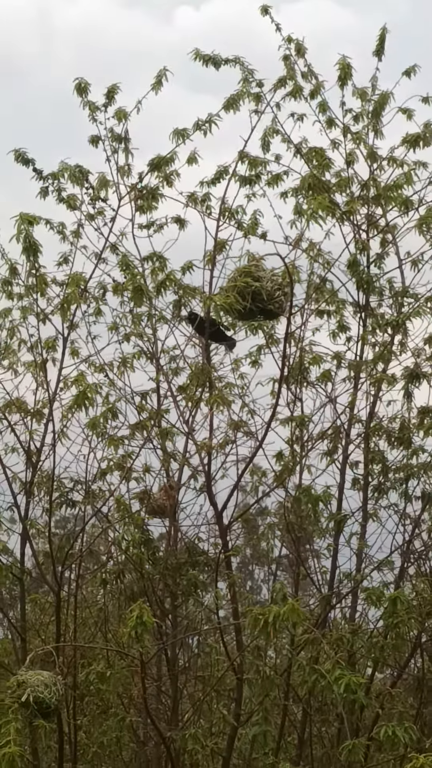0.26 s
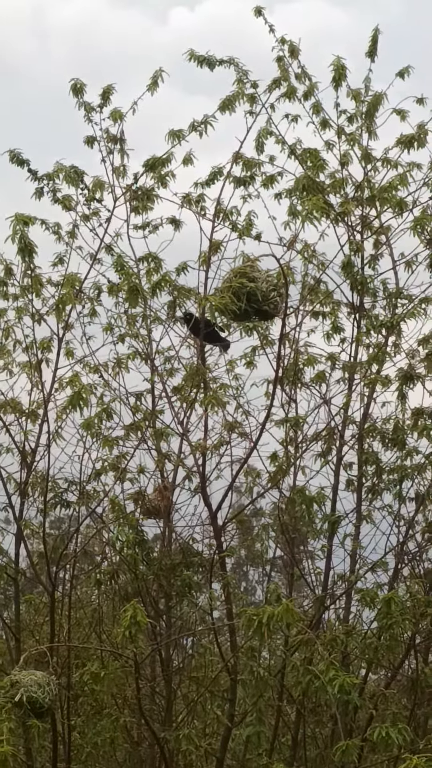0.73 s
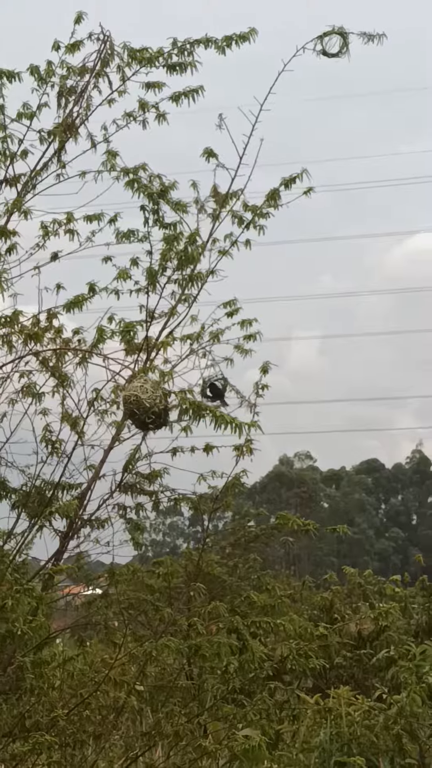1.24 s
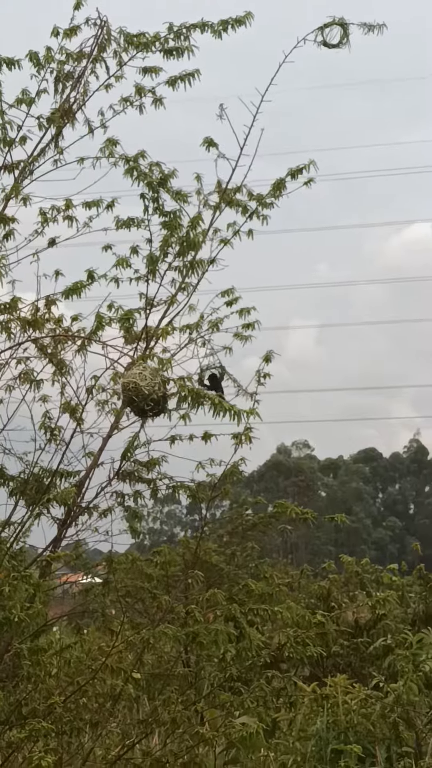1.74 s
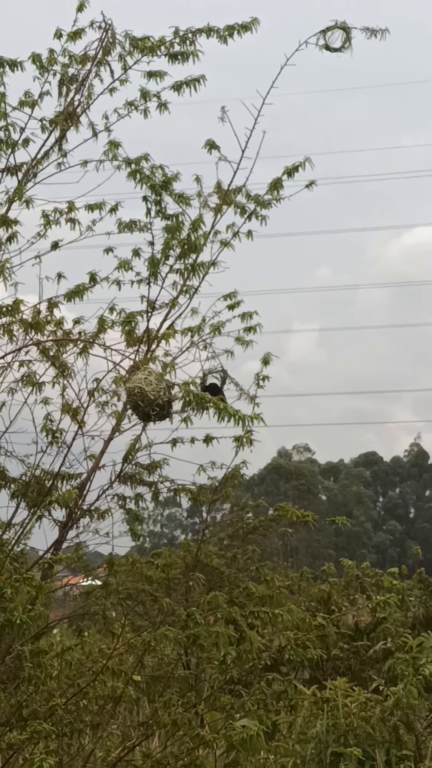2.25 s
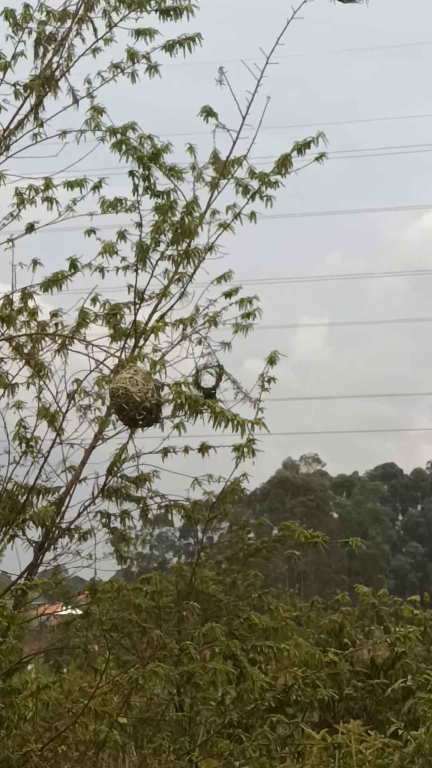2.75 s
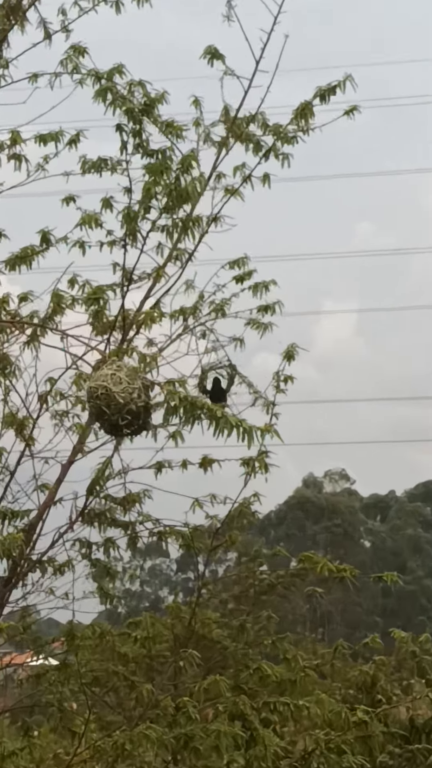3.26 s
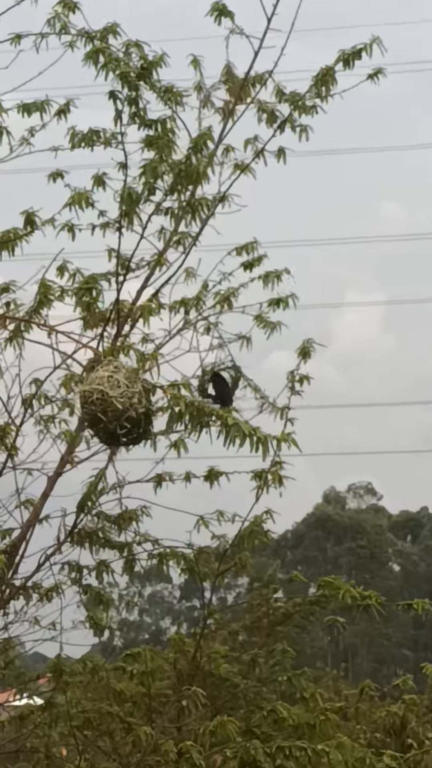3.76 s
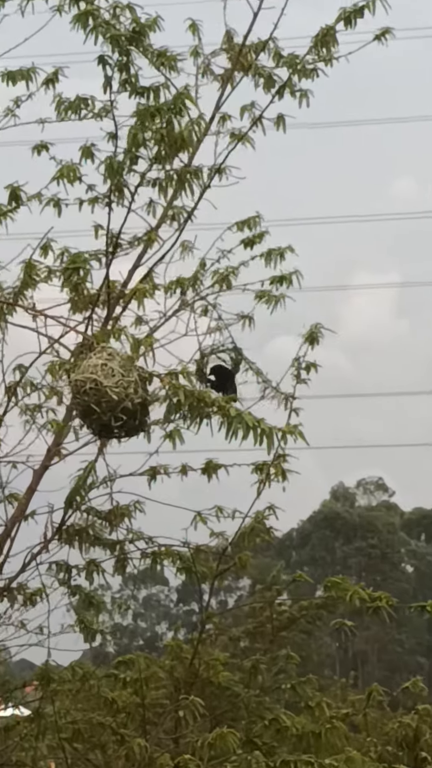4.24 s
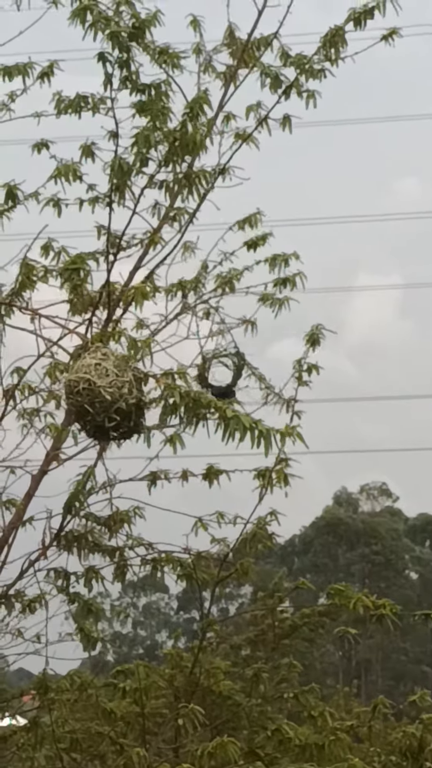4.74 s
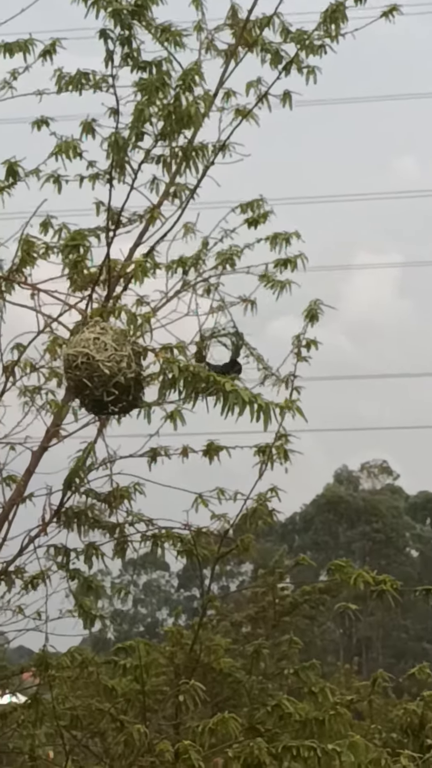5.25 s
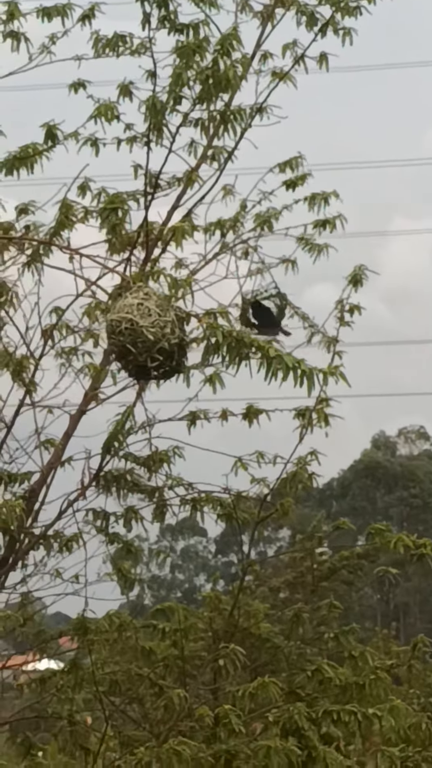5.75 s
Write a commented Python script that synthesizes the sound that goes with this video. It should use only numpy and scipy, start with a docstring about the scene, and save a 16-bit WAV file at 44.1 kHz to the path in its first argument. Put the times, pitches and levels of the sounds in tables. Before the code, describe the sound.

Many small birds twitter outdoors throughout, over trilling, droning insects, soft open air and a faint low rumble. Thin high whistles and faint hoarse calls come first. From about 0.3 seconds, nearer weaver birds, slightly to the left, give quick, sharp, rising chirps that crack into falling rasps, mixed with short whistled notes. A harsh buzz runs from 1.5 to 1.8 seconds. The chatter is busiest between 2 and 3 seconds. Squeaky, rasping scolds come at about 2.3, 3, 3.7 and 4.7 seconds and at the very end. Faint low rattles sound at 2.4 and 4.2 seconds, and two distant clear whistles arch at about 2.8 and 3.8. A high, buzzing wheeze holds from 3.7 to 4.3 seconds. A distant nasal call sags and drops from 5.1 to 5.7 seconds, while the chirps continue, slightly softer, until 6 seconds.

```python
"""Thin whistles and faint hoarse calls come first, then the two-voiced chirps of a weaver colony in the trees.
Chirps rise, level off or arch over, then crack into a falling rasp; scolds, a wheeze and a harsh buzz join.
The calls are sines on moving pitches, roughened by random jitter and scattered off leaves and trees.
Farther off are more birds, low rattles, a nasal call, trilling insects and a low outdoor rumble."""
import sys
import numpy as np
from scipy import signal
from scipy.fft import rfft, irfft, next_fast_len
from scipy.io import wavfile
from scipy.ndimage import uniform_filter1d, map_coordinates

SR = 44100
rng = np.random.default_rng(int(sys.argv[2]) if len(sys.argv) > 2 else 0)


def to_wav(sig):
    """Store sig (one row per channel, or 1-D mono) as 16-bit WAV at the path in sys.argv[1].

    Samples outside -1..1 are clipped; the rate is SR.
    """
    pcm = np.clip(np.atleast_2d(sig), -1, 1) * 32767
    pcm = np.round(pcm).astype(np.int16)
    wavfile.write(sys.argv[1], SR, pcm.T)  # frames by channels


N = 264600  # samples, six seconds

# Spectrum of the open air. Each row: frequency in Hz, relative density in dB per Hz.
AIR_SPECTRUM = [(110, 3.5), (180, 0), (300, 5), (520, -2.5), (900, -1), (1400, -3), (2100, -7.5),
                (2700, -36), (4000, -11), (7000, -69)]
# Spectrum of the low distant rumble. Each row: frequency in Hz, relative density in dB per Hz.
RUMBLE_SPECTRUM = [(12, -23), (25, -31), (32, -15), (42, 2), (54, -1), (70, -0.5), (110, -6.5),
                   (155, -19.5), (220, -28), (450, -81)]
RUMBLE_DB, RUMBLE_RISE_DB_PER_S, RUMBLE_SWING_DB = -53.5, 0.27, 1.5  # it grows slowly and wavers
# Levels of two nearer insects. Each row: time in seconds, cricket in dB, ticker in dB.
INSECT_LEVELS = [(0, -52, -72), (.3, -50, -52), (.9, -55, -56), (2.4, -62, -59), (3.2, -49.5, -51.5),
                 (3.6, -59, -47.5), (4.35, -57, -48.5), (4.53, -47, -45.5), (4.58, -49.5, -64),
                 (6, -48, -55)]
# Bands of many distant insects. Each row: centre in Hz, width in Hz, relative level in dB.
DRONE_BANDS = [(4210, 180, -9), (5600, 490, -6), (6650, 250, -7.5), (7670, 1050, -18)]
# Swell of the distant birds. Each row: time in seconds, reference level in dB.
COLONY_LEVEL = [(0.0, -54.5), (0.32, -49.5), (0.45, -44.5), (1.6, -45.5), (1.94, -44), (2.31, -41.5),
                (2.61, -43), (2.97, -42.5), (3.09, -47), (4.48, -48), (4.61, -43), (5.01, -48.5),
                (5.7, -53), (6.0, -48)]
# Spectrum of the distant birds. Each row: frequency in Hz, relative density in dB per Hz.
COLONY_SPECTRUM = [(1500, -17.5), (2200, -6.5), (2800, -10), (4000, 0), (5700, -5.5), (7000, -6),
                   (9500, -2.5), (10500, -12.5), (12000, -21), (14500, -14), (15800, -23)]
# Distant hoarse calls.
# Each row: start in seconds, length in seconds, mid pitch in Hz, glide in Hz, level in dB, hoarseness in Hz.
FAR_CALLS = [(0, 0.36, 2000, -220, -66.5, 22), (0.06, .17, 1504, -70, -61, 23),
             (0.19, .19, 1427, -150, -56.5, 21), (1.687, 0.08, 1535, 157, -56, 55),
             (1.682, 0.11, 770, 64, -61.5, 57), (2.866, 0.055, 1800, 250, -56, 40),
             (3.236, 0.037, 1706, -200, -51, 40), (3.652, 0.094, 1234, 374, -61.5, 70),
             (4.291, 0.13, 1473, 400, -57, 36), (5.065, 0.077, 2000, 100, -58, 35)]
# Two long, clear, distant whistles that rise, arch over and fade, one list each.
# Each row: time in seconds, pitch in Hz, level in dB before a shared lift.
FAR_WHISTLES = [
    [(2.78, 1273, -56), (2.84, 1487, -58), (3.0, 1427, -54), (3.13, 1278, -53.5), (3.27, 1195, -58),
     (3.33, 1150, -62), (3.52, 957, -66)],
    [(3.82, 1800, -56), (3.885, 2500, -60), (3.93, 2650, -54), (3.98, 2720, -62), (4.04, 2600, -49),
     (4.08, 2500, -52), (4.115, 2050, -75)],
]
# A distant nasal call that sags, then drops away.
# Each row: time in seconds, pitch in Hz, level in dB, hoarseness as a share of the pitch,
# other harmonics over the main one in dB.
NASAL_CONTOUR = [(5.13, 555, -57, 0.052, 9), (5.209, 537, -49.5, 0.048, 2), (5.361, 523, -49, 0.041, -3.5),
                 (5.499, 506, -48.5, 0.043, -6), (5.555, 455, -49, 0.031, -6), (5.595, 425, -43, 0.02, -14),
                 (5.63, 365, -59, 0.028, -12), (5.719, 260, -47, 0.094, -2)]
NASAL_MAIN = 4  # number of the main harmonic
# The other harmonics, with half steps where the voice doubles its period.
# Each row: multiple of the pitch, relative level in dB.
NASAL_HARMONICS = [(1, -10.5), (2, -8), (3, -4.5), (3.5, -15), (4.5, -5.5), (5, 0.5), (5.5, -8), (6, 0.5)]
# Low rattling calls.
# Each row: start in seconds, length in seconds, mid pitch in Hz, glide in Hz, level in dB.
CHURRS = [(2.41, 0.21, 975, 40, -58.5), (4.157, 0.194, 1089, 147, -56.5)]
CHURR_PULSE_HZ = 64.2
# Soft down-slurs, all on one contour. Each row: start in seconds, level in dB.
SLURS = [(0.905, -45), (1.221, -39), (2.274, -38.5), (3.08, -46), (3.189, -45.5), (3.615, -46),
         (3.899, -50), (4.893, -52), (5.157, -46), (5.204, -44.5)]
SLUR_S, SLUR_START_HZ, SLUR_MIDDLE_HZ, SLUR_END_HZ = .035, 4664, 4026, 2910
# Contour of the wheeze. Each row: time in seconds, pitch in Hz, level in dB.
WHEEZE_CONTOUR = [(3.66, 5640, -47.5), (3.774, 5470, -34.5), (3.859, 5524, -34.5), (4.022, 5520, -35),
                  (4.2, 5396, -36.5), (4.26, 5450, -39), (4.32, 5540, -51)]
# A harsh buzz. Each row: start in seconds, length in seconds, start pitch in Hz, end pitch in Hz,
# fall of each syllable in Hz, syllables per second, level in dB.
TRILLS = [(1.523, .29, 4164, 3504, 900, 63, -39.5)]
# Whistled notes.
# Each row: start in seconds, length in seconds, mid pitch in Hz, glide in Hz, level in dB.
NOTES = [(0, 0.1, 8320, 700, -42), (0.07, 0.017, 6820, -160, -32), (0.104, 0.014, 6650, -420, -33),
         (0.246, 0.091, 6700, -600, -41), (0.852, 0.031, 7150, 0, -39.5), (0.887, 0.029, 6270, 0, -39.5),
         (1.13, 0.021, 7190, 450, -36.5), (1.156, 0.04, 5840, -570, -31.5), (1.312, 0.07, 3985, 203, -39.5),
         (1.361, 0.06, 5950, -900, -38), (1.405, 0.03, 4210, -180, -36.5), (1.535, 0.015, 8850, -1550, -38),
         (1.571, 0.0188, 4200, -270, -38), (1.871, 0.03, 4120, -500, -34), (1.899, 0.022, 5100, 120, -40),
         (1.955, 0.021, 6960, -200, -41), (1.993, 0.072, 3920, -200, -38.5), (2.021, 0.12, 5540, 700, -42),
         (2.411, 0.021, 10270, -2100, -36), (2.441, 0.057, 5190, 302, -36),
         (2.519, 0.053, 5590, 500, -41.5), (2.599, 0.031, 6180, -1900, -37.5),
         (2.623, 0.052, 3990, -2, -37.5), (2.678, 0.029, 4300, 102, -38), (2.713, 0.036, 5100, 550, -37),
         (2.807, 0.056, 4220, 300, -37), (3.339, 0.061, 5650, 250, -36), (3.419, 0.039, 7300, -1300, -43),
         (3.445, 0.077, 5950, -1000, -37.5), (4.488, 0.027, 3380, 0, -40.5),
         (4.514, 0.0091, 5480, 602, -38.5), (4.561, 0.015, 6520, 3100, -40),
         (4.974, 0.031, 4210, -500, -43.5), (4.778, 0.079, 7100, 1500, -37.5)]
NOTE_ARCH = 0.0284  # both ends of a note sag by this share of its pitch
# Sound radiated by the open beak. Each row: frequency in Hz, gain in dB.
BEAK_GAIN = [(1000, 10.5), (2500, -12.5), (4000, -0.5), (6000, 4), (7500, 1), (9800, 4), (11500, -10),
             (15000, -17)]
# Harsh notes on their own. Each row: start in seconds, length in seconds, mid pitch in Hz,
# level in dB before the trim inside rasp(), wildness from 0 to 1.
RASPS = [(0.073, 0.071, 7190, -41.5, 1), (0.598, 0.05, 6360, -39.5, 0.73), (0.843, 0.073, 5490, -38.5, 1),
         (1.873, 0.061, 5006, -35.5, 0.9), (2.406, 0.018, 5270, -34, 0.63),
         (2.557, 0.055, 6440, -36.5, 0.96), (3.77, 0.0217, 5400, -41, .7),
         (5.217, 0.041, 4750, -35.5, 0.52), (5.607, 0.044, 4680, -34, 0.53)]
RASP_FALL = .17  # a long rasp sinks by this share of its pitch
# Scatter of pitch at a middling pitch; at equal wildness, lower rasps scatter more.
CHAOS_HZ, CHAOS_AT_HZ, CHAOS_SLOPE = 956, 5710, 1.25
# Scolds, a high squeak that breaks into a long rasp.
# Each row: start in seconds, squeak level in dB, rasp level in dB before the trim inside rasp().
SCOLDS = [(2.314, -30, -32.5), (2.99, -36, -33.5), (3.674, -35.5, -37.5), (4.711, -33.5, -39.5),
          (5.952, -37.5, -34)]
SQUEAK_S, SQUEAK_START_HZ, SQUEAK_END_HZ, SQUEAK_SWELL_DB = 0.052, 6790, 7430, 0.5
SQUEAK_LOWER_HZ = 2828  # ceiling of the lower voice
SCOLD_DELAY_S, SCOLD_S, SCOLD_HZ = .04, .082, 6580  # the rasp of a scold: delay, length, pitch
# Two-voiced chirps. Each row: start in seconds, length in seconds, shape, pitch at no climb in Hz,
# pitch at full climb in Hz, level in dB before a shared lift, sum tone of the two voices in dB,
# overtones in dB, closing rasp over the listed chirp level in dB before the trim inside rasp().
CHIRPS = [(0.327, 0.078, "sweep", 5010, 7090, -30, -9.5, 1, -3),
          (0.454, 0.133, "sweep", 5420, 7820, -32.5, -11.5, 3, -22),
          (0.59, 0.078, "sweep", 5560, 7470, -41, -24, -19, 1),
          (0.737, 0.09, "shelf", 5050, 6750, -31, -7.5, 0, -4),
          (.988, 0.091, "arch", 5250, 6750, -30, -10, 4, -0.5),
          (1.261, 0.099, "arch", 5255, 6765, -31, -12.5, -1, -4.5),
          (1.402, 0.061, "sweep", 5540, 8460, -37, -13, -10, -25),
          (1.579, 0.095, "arch", 5260, 6670, -31, -8.5, -2, -3),
          (2.091, 0.071, "arch", 5350, 7540, -32, -13.5, -8, 0.5),
          (2.177, 0.091, "shelf", 5330, 7100, -33.5, -9.5, -15, -14),
          (2.746, 0.043, "sweep", 5640, 7740, -34.5, -22, -14, -1),
          (2.82, 0.096, "shelf", 5750, 7105, -31, -15.5, -23, -20),
          (4.036, 0.07, "sweep", 5270, 6680, -28, -11, -8, -22),
          (4.399, 0.068, "sweep", 5720, 7860, -34.5, -12, -2, 0.5),
          (4.589, 0.095, "shelf", 5150, 6980, -30, -10, -3, -7),
          (4.96, 0.11, "shelf", 5230, 6730, -35, -11.5, -3, -5),
          (5.31, 0.099, "shelf", 5230, 6710, -35.5, -13, -7, -12),
          (5.559, .066, "sweep", 5870, 7720, -41, -18, -10, -15),
          (5.749, 0.091, "shelf", 5290, 6820, -32.5, -7.5, -2, -0.5)]
# Chirp shapes by name. Each row: share of the length, share of the climb,
# ceiling of the lower voice in Hz, effort in dB, the lower voice's octave in dB.
CHIRP_SHAPES = { "shelf": [(0, -.2, 3100, -10, -12), (.15, .17, 3100, -6, -14), (.4, 0.34, 3120, -3.5, -30),
                (.58, 0.75, 3110, -3, -5.5), (.8, .94, 2650, -3.5, -7.5), (1, 0.89, 2350, -4, -15)],
                "arch": [(0, -.05, 2400, -14, -17.5), (.24, .35, 2440, -0.5, -18), (.5, .8, 2394, -5, -18),
                (.68, 1, 2298, -2.5, -18), (.86, .93, 2255, -0.5, -13), (1, 0.51, 2200, -6.5, -10)],
                "sweep": [(0, 0.021, 3130, -6, -21), (.2, .18, 3110, -8, -25), (.5, .46, 3085, -3.5, -12),
                (.8, 0.78, 2954, -1.5, -11), (1, 0.87, 2455, 0, -18.5)]}
# The closing rasp: lead before the chirp ends, length, pitch, share of it lost.
BREAK_LEAD_S, BREAK_S, BREAK_HZ, BREAK_FALL = 0.0096, .025, 5830, 0.41
TOP_HZ = 15800  # band limit of the recorder


def amp(db):
    """Decibels to gain."""
    return 10 ** (np.asarray(db) / 20)


def unit(x):
    """Scale to rms 1."""
    return x / np.sqrt(np.mean(x ** 2) + 1e-20)


def along(points, hz):
    """(Hz, value) points read on a log axis."""
    f, v = np.transpose(points)
    return np.interp(np.log(np.abs(hz) + 1), np.log(f + 1), v)


def curves(rows):
    """One value per sample for each column after the time."""
    s, *cols = np.transpose(rows)
    return [np.interp(np.arange(N) / SR, s, c) for c in cols]


def span(rows):
    """Start time of a contour and the slice of samples it covers."""
    first, last = rows[0][0], rows[-1][0]
    return first, slice(int(first * SR), int(last * SR))


def wobble(rate, size):
    """A smooth random curve with rate knots a second."""
    knots = rng.standard_normal(int(size * rate / SR) + 4)
    return map_coordinates(knots, [np.arange(size) * rate / SR], mode="nearest")


def filtered(x, response):
    """x times a response of frequency."""
    m = next_fast_len(N + SR // 2)
    return irfft(rfft(x, m) * response(np.fft.rfftfreq(m, 1 / SR)), m)[..., :N]


def phase(hz):
    """Running phase of a moving frequency."""
    return 2 * np.pi * np.cumsum(hz) / SR


def progress(length):
    """0 to 1 over one call."""
    return np.linspace(0, 1, int(length * SR))


def arch(u, start, middle, end):
    """A parabolic glide through three pitches."""
    return np.polyval(np.polyfit([0, .5, 1], [start, middle, end], 2), u)


def gate(u, rise, fall):
    """Soft opening and closing, as shares of the call."""
    return np.sin(np.pi / 2 * np.clip(np.minimum(u / rise, (1 - u) / fall), 0, 1)) ** 2


def add(out, s, sound):
    """Mix a stereo sound in at time s."""
    i = min(max(round(s * SR), 0), N)
    out[:, i:i + sound.shape[1]] += sound[:, :N - i]


def scatter(t60):
    """Stereo noise echoes that build within milliseconds and die by 60 dB in t60 seconds."""
    t = np.arange(SR // 3) / SR
    echoes = rng.standard_normal((2, len(t))) * amp(-60 * t / t60) * (1 - np.exp(-t / .002))
    return unit(echoes) / np.sqrt(len(t))


def outdoors(call, leaves_db, trees_db, left_db, lag=.001, stray=.08):
    """The direct path, a quick scatter off nearby leaves, and a faint tail from the trees around."""
    paths = amp(leaves_db) * scatter(t60=.03) + amp(trees_db) * scatter(t60=.35)
    paths *= amp([[1.5], [-1.5]])
    left_delay = abs(lag * (1 + stray * rng.standard_normal()))  # each perch has its own bearing
    paths[0, int(left_delay * SR)] += amp(left_db / 2)
    paths[1, 0] += amp(-left_db / 2)
    return signal.fftconvolve(call[None], paths / np.sqrt(np.sum(paths ** 2) / 2), axes=1)


def rush(spectrum, alike, patchy_db, left_db, lag=0.001033):
    """Stereo noise of rms 1 with patches of random gain; it reaches the left side a little later."""
    z = signal.stft(rng.standard_normal((2, N)), nperseg=512)[2]
    field = uniform_filter1d(rng.standard_normal(z.shape[1:]), size=6, axis=0)  # across frequency
    field = uniform_filter1d(field, size=9, axis=1)  # across time
    pair = signal.istft(z * amp(patchy_db * unit(field)), nperseg=512)[1][:, :N]
    mid, side = filtered(pair, lambda hz: amp(along(spectrum, hz)))
    side = side * np.tan(np.arccos(np.clip(alike, 0, 1)) / 2)
    left = filtered(mid + side, lambda hz: np.exp(-2j * np.pi * hz * lag))
    return unit(np.array([left, mid - side]) * amp([[left_db / 2], [-left_db / 2]]))


def background(air_db=-57):
    """Open air and a low distant rumble, both shaped noise."""
    rumble_db = RUMBLE_DB + RUMBLE_RISE_DB_PER_S * np.arange(N) / SR + RUMBLE_SWING_DB * wobble(9, N)
    air = amp(air_db) * rush(AIR_SPECTRUM, alike=0.62, patchy_db=2.5, left_db=5.0)
    return air + amp(rumble_db) * rush(RUMBLE_SPECTRUM, alike=1.0, patchy_db=0.5, left_db=3.5)


def stridulation(db, stroke_hz, ring_hz, droop_hz, duty, uneven, leaves_db, left_db):
    """Each wing stroke rings one resonance, whose pitch droops through the stroke; the level wavers."""
    stroke = (phase(stroke_hz * (1 + uneven * wobble(12, N))) / (2 * np.pi)) % 1
    tone = np.sin(phase(ring_hz + droop_hz * (.5 - stroke / duty) + 130 * wobble(1200, N)))
    call = amp(db + 2 * wobble(30, N)) * unit(tone * gate(stroke / duty, rise=.25, fall=.4))
    return outdoors(call, leaves_db, trees_db=-13, left_db=left_db, lag=.00155, stray=0)[:, :N]


def insects(drone_db=-45):
    """A trilling cricket, a higher and faster ticker, and the steady drone of many more."""
    cricket_db, ticker_db = curves(INSECT_LEVELS)
    cricket = stridulation(cricket_db, stroke_hz=39.76, ring_hz=4530, droop_hz=764, duty=.8,
                           uneven=0.045, leaves_db=-3.5, left_db=1.0)
    ticker = stridulation(ticker_db, stroke_hz=68.9, ring_hz=8346, droop_hz=215.4, duty=0.6,
                          uneven=0.0081, leaves_db=0, left_db=17.5)
    hz = np.geomspace(1000, SR / 2, 400)
    bands = sum(amp(db) / (1 + ((hz - centre) / width) ** 2) ** 2 for centre, width, db in DRONE_BANDS)
    spectrum = np.transpose([hz, 20 * np.log10(bands)])
    drone = rush(spectrum, alike=0.09, patchy_db=2.0, left_db=2.0)
    return cricket + ticker + amp(drone_db) * drone


def whistle(u, hz, waver, overtone_db):
    """One thin tone of rms 1 with an unsteady pitch and a weak octave."""
    hz = hz * (1 + waver * wobble(343, len(u)))
    octave = amp(overtone_db + along(BEAK_GAIN, 2 * hz)) * np.sin(phase(2 * hz))
    tone = np.sin(phase(hz)) + octave * (2 * hz < SR / 2)
    strength = gate(u, rise=.25, fall=.12) * amp(2.2 * wobble(220, len(u)))
    return unit(tone * strength)


def colony(count=950, size=14, blur_db=-0.4, slur_db=-8.5):
    """Faint, mostly falling slurs from many perches, crowding as the level swells, over a noise blur of voices."""
    level, = curves(COLONY_LEVEL)
    out = amp(level + blur_db) * rush(COLONY_SPECTRUM, alike=0.02, patchy_db=6.0, left_db=2.5)
    activity = np.cumsum(amp(level))
    perches = np.zeros((size, 1, N))
    for when, length, height, slope, bend, strength, perch in rng.random((count, 7)):
        i = np.searchsorted(activity, when * activity[-1])
        u = progress(0.014 + .028 * length)
        centre = 1750 * 5.2 ** (height ** .95)
        steepness = (2500 / centre) ** 0.7  # low slurs sweep widest
        sweep = 0.74 * (slope - .7) * (u - .5) - 0.633 * bend * (u - .5) ** 2
        hz = centre * (1 + steepness * sweep)
        db = level[i] + slur_db + .75 * along(COLONY_SPECTRUM, centre) + 8 * (strength - .5)
        call = amp(db) * whistle(u, hz, waver=0.016, overtone_db=-32)
        add(perches[int(perch * size)], i / SR, call[None])
    for calls in perches:
        add(out, 0, outdoors(calls[0], leaves_db=-1, trees_db=-7, left_db=10))
    return out


def far_voice(hz, db, hoarse_hz, fade):
    """One low tone from beyond the colony, roughened by a jittering pitch."""
    u = np.linspace(0, 1, len(hz))
    tone = np.sin(phase(hz + hoarse_hz * wobble(600, len(u))))
    return outdoors(amp(db) * unit(tone * gate(u, fade, fade)), leaves_db=-7, trees_db=-5, left_db=14)


def far_calls(whistle_lift_db=1, whistle_hoarse_hz=13):
    """Lower, slower calls from beyond the colony: hoarse glides and long clear whistles."""
    out = np.zeros((2, N))
    for s, length, hz, glide_hz, db, hoarse_hz in FAR_CALLS:
        pitch = hz + glide_hz * (progress(length) - .5)
        add(out, s, far_voice(pitch, db, hoarse_hz, fade=0.036))
    for rows in FAR_WHISTLES:
        first, part = span(rows)
        hz, db = np.array(curves(rows))[:, part]
        add(out, first, far_voice(hz, db + whistle_lift_db, whistle_hoarse_hz, fade=0.025))
    return out


def nasal_call():
    """A far voice: hoarse harmonics thin to a clearer tone near the end, then roughen in the final drop."""
    first, part = span(NASAL_CONTOUR)
    hz, db, hoarse, others_db = np.array(curves(NASAL_CONTOUR))[:, part]
    cycle = phase(hz * (1 + hoarse * wobble(380, len(hz))))
    others = sum(amp(level + 3 * wobble(14, len(hz))) * np.sin(k * cycle) for k, level in NASAL_HARMONICS)
    voice = np.sin(NASAL_MAIN * cycle) + amp(others_db) * others
    call = amp(db) * unit(voice) * gate(np.linspace(0, 1, len(hz)), rise=0.039, fall=0.026)
    out = np.zeros((2, N))
    add(out, first, outdoors(call, leaves_db=-5, trees_db=-5, left_db=12))
    return out


def churrs(chaos_hz=110):
    """A low, hoarse rattle from beyond the colony: a quick run of rough pulses that swells and fades."""
    out = np.zeros((2, N))
    for s, length, hz, glide_hz, db in CHURRS:
        u = progress(length)
        pulse = (u * length * CHURR_PULSE_HZ + .08 * wobble(40, len(u))) % 1
        pitch = hz + glide_hz * (u - .5) + chaos_hz * wobble(500, len(u))
        swell = gate(u, rise=.15, fall=0.33) * amp(2.8 * wobble(60, len(u)))
        strength = gate(pulse, rise=0.29, fall=0.45) * swell
        call = amp(db) * unit(np.sin(phase(pitch)) * strength)
        add(out, s, outdoors(call, leaves_db=-3, trees_db=-5.5, left_db=7.5))
    return out


def tick(db=-50, start_s=.425):
    """One soft tick: a brief sine that drops quickly in pitch."""
    u = progress(0.0124)
    drop = np.sin(phase(1800 * 0.16 ** u)) * gate(u, rise=0.12, fall=0.62)
    out = np.zeros((2, N))
    add(out, start_s, outdoors(amp(db) * unit(drop), leaves_db=-6, trees_db=-24, left_db=5))
    return out


def slurs(spread=0.041):
    """One falling note, repeated at slightly different pitches from deep in the leaves."""
    out = np.zeros((2, N))
    u = progress(SLUR_S)
    contour = arch(u, SLUR_START_HZ, SLUR_MIDDLE_HZ, SLUR_END_HZ)
    for s, db in SLURS:
        pitch = contour * (1 + spread * rng.standard_normal())
        call = whistle(u, pitch, waver=0.04, overtone_db=-25)
        add(out, s, outdoors(amp(db) * call, leaves_db=5, trees_db=-1, left_db=10))
    return out


def wheeze(pulse_hz=368, hiss_db=-13.0, fizz_db=-27):
    """A drawn-out buzz: fast uneven pulses on one high tone, with fuzzy overtones."""
    hz, db = curves(WHEEZE_CONTOUR)
    beat = phase(pulse_hz * (1 + 0.0712 * wobble(120, N)))
    tone = np.sin(phase(hz + 55 * wobble(60, N) + 125 * wobble(900, N) + 130 * np.sin(beat)))
    hiss = amp(hiss_db) * np.sin(phase(1.88 * hz + 450 * wobble(2000, N)))
    fizz = amp(fizz_db) * np.sin(phase(2.4 * hz + 700 * wobble(1800, N)))
    call = amp(db) * unit((1 + 0.55 * np.cos(beat)) * (tone + hiss + fizz))
    first, part = span(WHEEZE_CONTOUR)
    out = np.zeros((2, N))
    add(out, first, outdoors(call[part], leaves_db=-5.0, trees_db=-9.0, left_db=-5, lag=0.001093))
    return out


def trills(chaos_hz=230):
    """A dense buzz of tiny, rough, unevenly spaced down-slurs."""
    out = np.zeros((2, N))
    for s, length, start, end, fall_hz, rate, db in TRILLS:
        u = progress(length)
        syllable = (u * length * rate + .24 * wobble(60, len(u))) % 1
        hz = start + (end - start) * u + fall_hz * (.5 - syllable) + chaos_hz * wobble(1500, len(u))
        swell = amp(2.5 * wobble(400, len(u))) * gate(u, rise=.15, fall=.15)
        strength = gate(syllable, rise=.15, fall=.3) * swell
        call = amp(db) * unit(np.sin(phase(hz)) * strength)
        add(out, s, outdoors(call, leaves_db=-3, trees_db=-6, left_db=11))
    return out


def notes():
    """Short, slightly arched whistles, stronger on the left."""
    out = np.zeros((2, N))
    for s, length, hz, glide_hz, db in NOTES:
        u = progress(length)
        pitch = hz * (1 - NOTE_ARCH * (2 * u - 1) ** 2) + glide_hz * (u - .5)
        call = whistle(u, pitch, waver=0.0358, overtone_db=-13)
        add(out, s, outdoors(amp(db) * call, leaves_db=-2, trees_db=-8, left_db=9))
    return out


def rasp(length, hz, fall, wildness, trim_db=-1, upper_db=-6, lower_db=-7, overtone_db=-12):
    """The syrinx goes chaotic: pitch and strength jump about from one millisecond to the next."""
    u = progress(length)
    chaos_hz = wildness * CHAOS_HZ * (CHAOS_AT_HZ / hz) ** CHAOS_SLOPE
    half_pitch = (hz * (1 + fall * (.5 - u)) + chaos_hz * wobble(2200, len(u))) / 2
    voice = 0
    for k, partial_db in enumerate([lower_db, 0, upper_db, overtone_db], 1):
        partial_hz = k * half_pitch
        voice = voice + amp(partial_db + along(BEAK_GAIN, partial_hz)) * np.sin(phase(partial_hz))
    call = unit(voice * gate(u, rise=0.11, fall=0.12) * amp(2.1 * wobble(693, len(u))))
    return outdoors(amp(trim_db) * call, leaves_db=1.5, trees_db=-3.5, left_db=7.0)


def rasps():
    """Harsh chaotic notes, each standing alone."""
    out = np.zeros((2, N))
    for s, length, hz, db, wildness in RASPS:
        add(out, s, amp(db) * rasp(length, hz, RASP_FALL, wildness))
    return out


def two_voices(u, pitch, ceiling, effort_db, octave_db, overtone_db, lower_db=-13, sum_db=-9,
               difference_db=-19):
    """Two sides of the syrinx: the lower stays an octave down where its ceiling allows, else they beat."""
    size = len(u)
    waver = .009 * wobble(160, size) + (.015 + .024 * u ** 3) * wobble(1500, size)
    upper = pitch * (1 + waver)
    lower = np.minimum(upper / 2, ceiling * (1 + 0.0066 * wobble(882, size)))
    fuzz = 300 * wobble(1900, size)  # the highest partials are hoarse
    high_db = overtone_db - 18 * (1 - u)  # and grow through the call
    partials = [(lower, lower_db), (2 * lower, octave_db),
                (upper + lower, sum_db), (upper - lower, difference_db),
                (2 * upper + fuzz, high_db), (upper + 2 * lower - fuzz, high_db - 10)]
    voice = amp(along(BEAK_GAIN, upper)) * np.sin(phase(upper))
    for hz, partial_db in partials:
        strength_db = partial_db + along(BEAK_GAIN, hz) + 3 * wobble(45, size)
        voice = voice + amp(strength_db) * np.sin(phase(hz))
    unsteady_db = 2 * wobble(170, size) + 1.5 * wobble(900, size)
    effort = gate(u, rise=.08, fall=.05) * amp(effort_db + unsteady_db)
    return outdoors(unit(voice * effort), leaves_db=-1.5, trees_db=-10, left_db=7)


def scolds():
    """A short, high, two-voiced squeak gives way to a long rasp."""
    out = np.zeros((2, N))
    u = progress(SQUEAK_S)
    pitch = SQUEAK_START_HZ + (SQUEAK_END_HZ - SQUEAK_START_HZ) * u
    for s, squeak_db, rasp_db in SCOLDS:
        squeak = two_voices(u, pitch, SQUEAK_LOWER_HZ, SQUEAK_SWELL_DB * u, octave_db=-17,
                            overtone_db=-1, sum_db=-7.5)
        add(out, s, amp(squeak_db) * squeak)
        harsh = rasp(SCOLD_S, SCOLD_HZ, RASP_FALL, wildness=1.0)
        add(out, s + SCOLD_DELAY_S, amp(rasp_db) * harsh)
    return out


def chirps(lift_db=0.5):
    """Each two-voiced chirp climbs along one of three shapes and ends in a rough plunge."""
    out = np.zeros((2, N))
    for s, length, shape, start, top, db, sum_db, overtone_db, rasp_db in CHIRPS:
        u = progress(length)
        share, *columns = np.transpose(CHIRP_SHAPES[shape])
        smooth = [uniform_filter1d(np.interp(u, share, c), size=300, mode="nearest") for c in columns]
        climb, ceiling, effort_db, octave_db = smooth
        pitch = start + (top - start) * climb
        chirp = two_voices(u, pitch, ceiling, effort_db, octave_db, overtone_db, sum_db=sum_db)
        add(out, s, amp(db + lift_db) * chirp)
        plunge = rasp(BREAK_S, BREAK_HZ, BREAK_FALL, wildness=0.795)
        add(out, s + length - BREAK_LEAD_S, amp(db + rasp_db) * plunge)
    return out


def scene():
    """All voices together, from the far background to the chirps."""
    distance = background() + insects() + colony() + far_calls() + nasal_call() + churrs()
    tree = tick() + slurs() + wheeze() + trills() + notes() + rasps()
    return distance + tree + scolds() + chirps()


def record(dry):
    """The recorder keeps nothing above its band limit."""
    return filtered(dry, lambda hz: hz < TOP_HZ)


dry = scene()
out = record(dry)
to_wav(out)
```